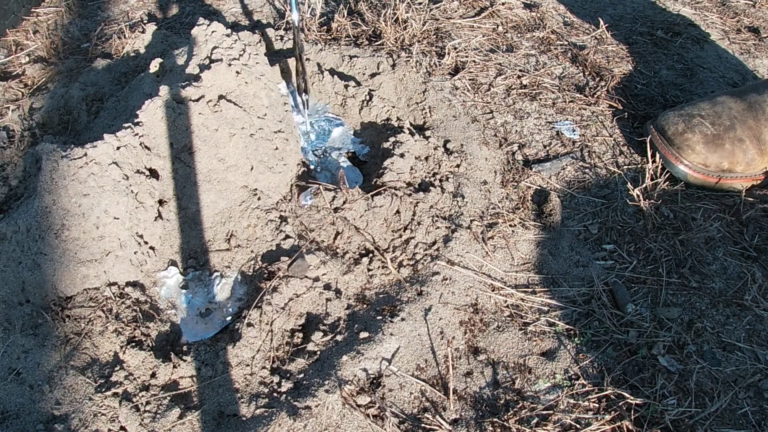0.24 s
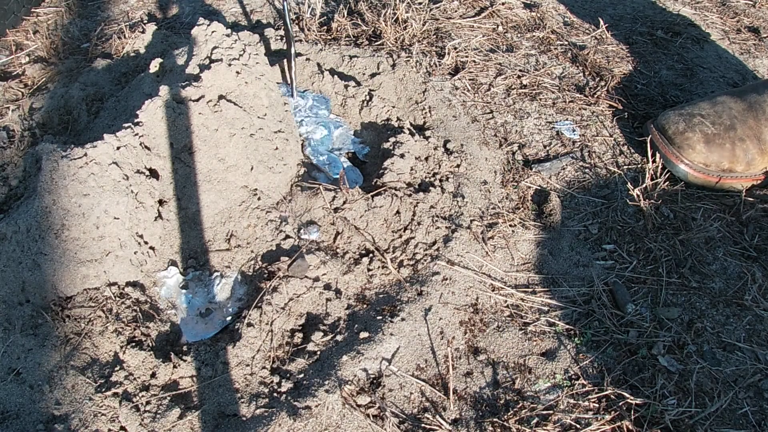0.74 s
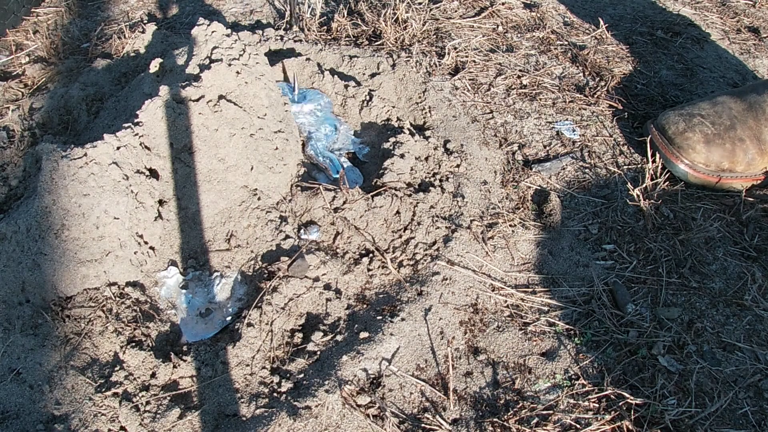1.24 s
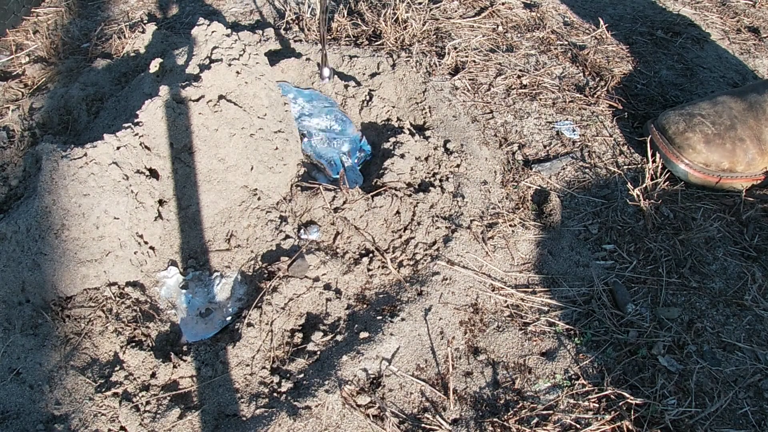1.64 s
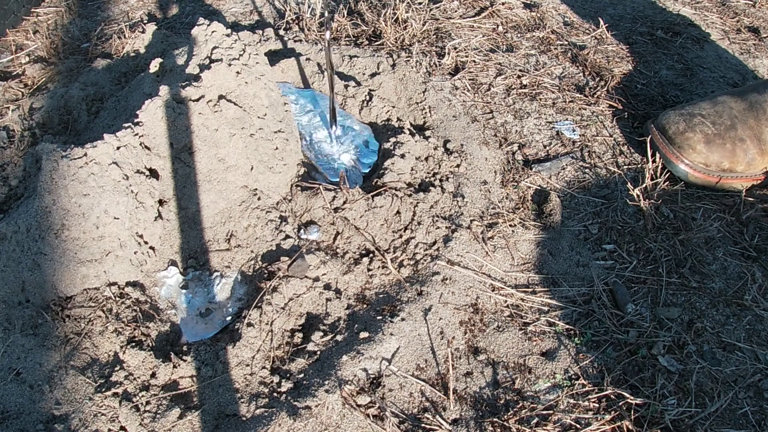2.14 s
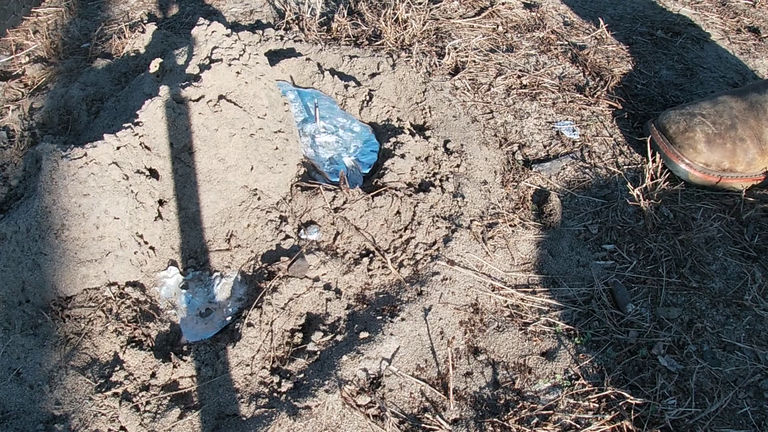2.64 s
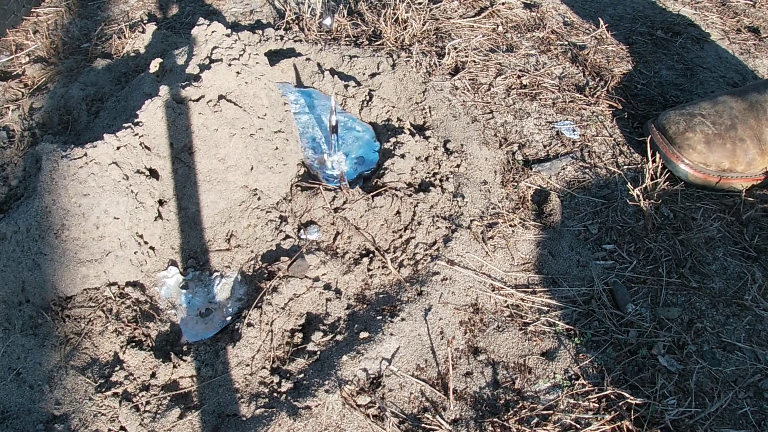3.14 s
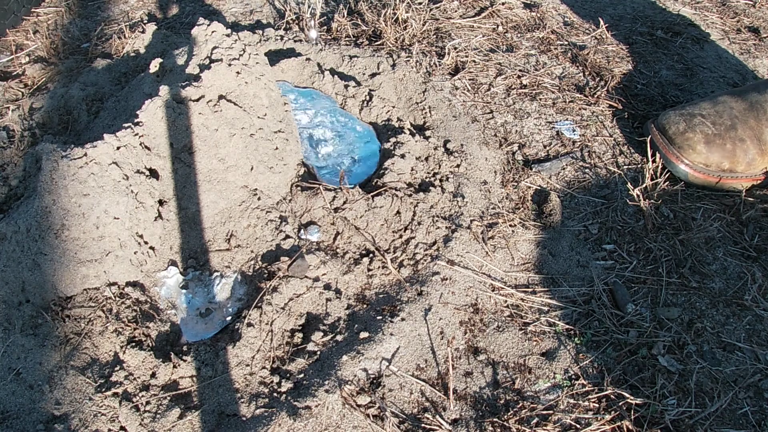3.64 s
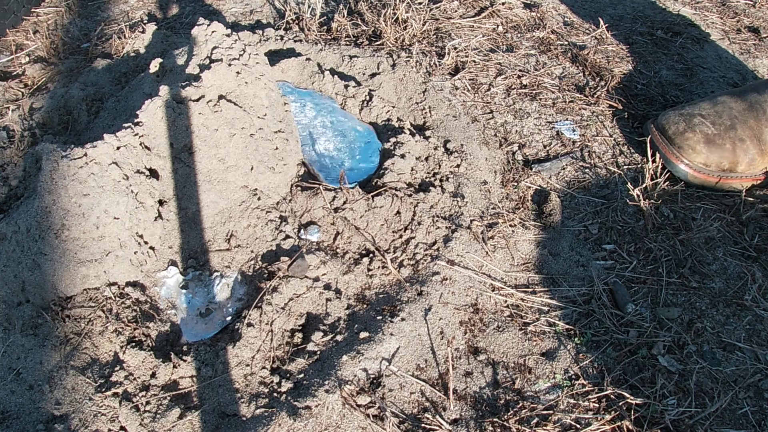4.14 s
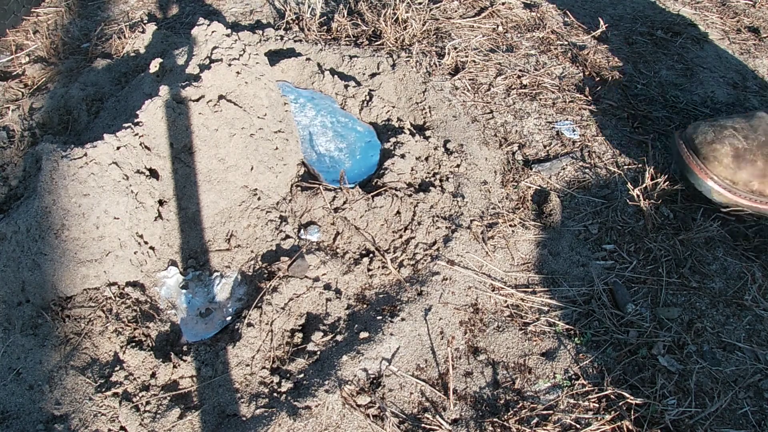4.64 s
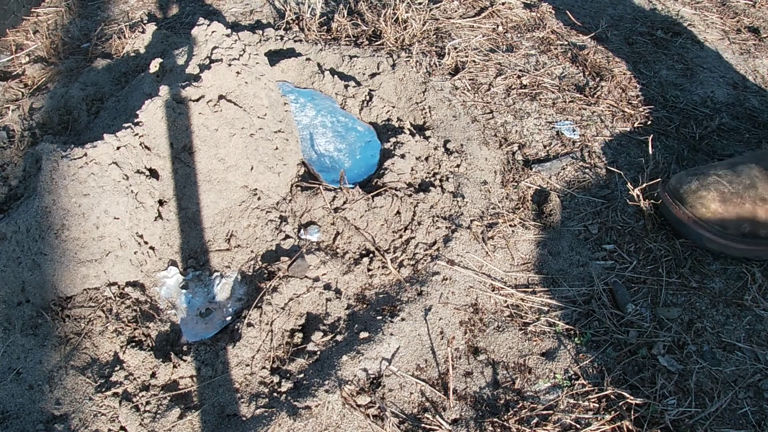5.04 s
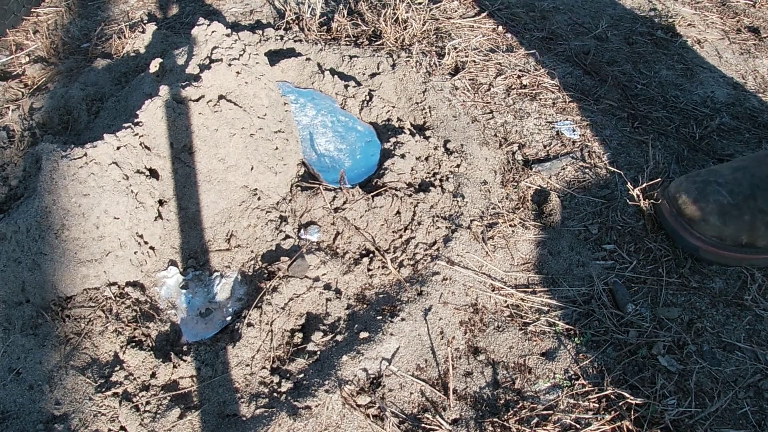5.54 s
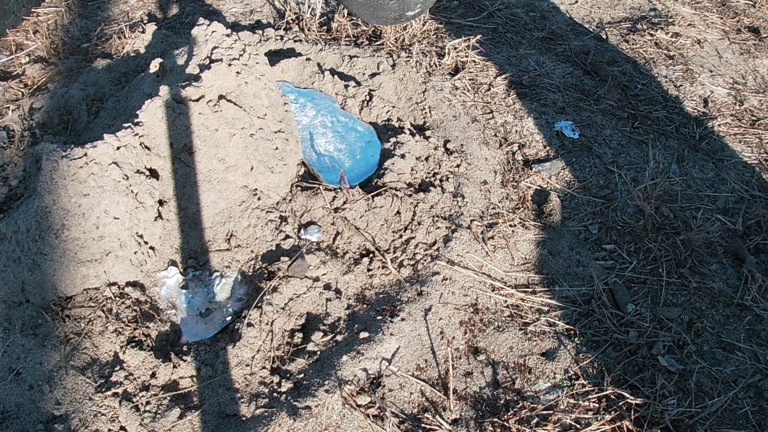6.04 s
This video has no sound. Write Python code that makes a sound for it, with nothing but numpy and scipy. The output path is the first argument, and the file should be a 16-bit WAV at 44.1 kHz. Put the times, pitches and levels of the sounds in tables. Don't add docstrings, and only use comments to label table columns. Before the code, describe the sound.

Constant burner roar outdoors, low rumble swelling and sagging irregularly beneath a steady airy rush. A small single-cylinder engine adds a slightly wavering drone and a fast, fizzy metallic rattle. A moving body dulls and reopens the high end. Faint crisp ticks come from hot metal and dry straw; the drone thickens in the second half, then a short boot thud lands just before the close. Open air, no reverberation, faint microphone hiss.

```python
import sys
import numpy as np
from scipy import signal
from scipy.io import wavfile
from scipy.ndimage import uniform_filter1d

SR = 44100
rng = np.random.default_rng(int(sys.argv[2]) if len(sys.argv) > 2 else 0)


def materialize(psi):
    bounded = np.clip(np.atleast_2d(psi).T, -1, 1)
    quanta = np.round(bounded * 32767).astype(np.int16)
    wavfile.write(sys.argv[1], SR, quanta)


def ratio(d):
    e = np.asarray(d, float) / 20
    return 10 ** e


N = 276948
TIME_S = np.arange(N) / SR

# (time [s], level [dB])
REACH = [(0.0, -51), (0.3, -49), (1.38, -49), (1.5, -51.5), (1.61, -48.5), (1.87, -51), (2.01, -47.5),
         (2.13, -50), (3.08, -43.5), (3.38, -47.5), (3.88, -45), (4.25, -46.5), (4.51, -53.5), (4.9, -48),
         (5.18, -51), (5.3, -46), (5.7, -48), (6.28, -48.5)]


def evened(x):
    return x / np.sqrt(np.mean(x ** 2) + 1e-20)


def columns(rows):
    time_s, *values = np.transpose(rows)
    return [np.interp(TIME_S, time_s, v) for v in values]


def noise(spectrum, modes=(), patchy_db=1.5, drift_db=0., tilt_db=np.zeros(N), size=1024):
    # (time [s], stance [0 first - 1 second])
    stance_path = [(0, .4), (.35, .05), (1.1, .05), (1.35, .5), (2.0, .6), (2.6, .9), (4.3, .95), (5.1, .8),
                   (5.35, .15), (5.5, .15), (5.7, .8), (6.28, .8)]
    hop = size // 4
    hz = np.fft.rfftfreq(size, 1 / SR)[:, None]
    at = np.minimum(np.arange(N // hop + 5) * hop, N - 1)
    real, imag, patches, drift = rng.standard_normal((len(at), len(hz), 4)).T
    patches = uniform_filter1d(patches, size=8, axis=0)
    patches = evened(uniform_filter1d(patches, size=10, axis=1))
    drift = uniform_filter1d(drift, size=3, axis=0)
    drift = evened(uniform_filter1d(drift, size=160, axis=1))

    stance = np.clip(columns(stance_path)[0][at], 0, 1)
    knot_hz, knot_db = np.transpose(spectrum)
    colour_db = np.interp(np.log(hz + 1), np.log(knot_hz + 1), knot_db, left=-120, right=-120)
    for centre_hz, width_hz, first_db, second_db in modes:
        lift_db = first_db + stance * (second_db - first_db)
        colour_db = colour_db + lift_db / (1 + (2 * (hz - centre_hz) / width_hz) ** 2)
    upper = np.clip(np.log2(hz / 2000 + 1e-9) / 0.5, 0, 1)
    field = ratio(colour_db + patchy_db * patches + drift_db * drift + upper * tilt_db[at])
    sound = signal.istft((real + 1j * imag) * field, nperseg=size, noverlap=size - hop)[1]
    return evened(sound[:N])


def resonate(x, hz, width_hz):
    turn = np.exp(2j * np.pi * hz * np.arange(len(x)) / SR)
    r = np.exp(-np.pi * width_hz / SR)
    return 2 * (turn * signal.lfilter([1 - r], [1, -r], x / turn)).real


def pipe_note():
    # (centre [Hz], width [Hz], level [dB])
    pipe = [(885, 41, 19), (870, 55, -5.5)]
    # (time [s], level [dB])
    pipe_view = [(0, -45), (.25, -42), (3.0, -44), (3.6, -43), (4.4, -45.5), (5.2, -49.5), (5.55, -48.5),
                 (5.95, -42.5), (6.28, -52)]
    air = rng.standard_normal(N)
    note = np.zeros(N)
    for hz, width_hz, level_db in pipe:
        narrow = resonate(air, hz, width_hz)
        note += ratio(level_db) * resonate(narrow, hz, 1.66 * width_hz)
    return ratio(columns(pipe_view)[0]) * evened(note)


def flame():
    # (time [s], flame [dB], edge [dB])
    burning = [(0, -30, -2), (.35, -25.5, 1.5), (.75, -29, 0), (1.15, -24.5, -2), (1.5, -26.5, -0.5),
               (1.8, -26.5, 0), (2.3, -26.5, 0), (2.75, -28, -1.5), (3.3, -25, 1), (3.75, -29, 0),
               (4.1, -27, 0), (4.45, -26, 0), (4.7, -28, -0.5), (5.1, -28, 0.5), (5.45, -27, -0.5),
               (5.7, -22.5, -1), (5.9, -32, -1), (6.28, -30, 2)]
    # (frequency [Hz], density [dB per Hz])
    rumble_spectrum = [(7.1, -50), (12, -16), (32, -18), (50, -12.5), (86, -5.5), (122, -1.5), (186, 1),
                       (242, -1), (289, -10.5), (403, -18.5), (464, -20), (659, -35.5), (720, -46.5),
                       (800, -24.5), (1040, -57.5), (1760, -120)]
    upper_base_db, upper_share = -23, 0.18
    flame_db, edge_db = columns(burning)
    gust = uniform_filter1d(rng.standard_normal(N), size=1500)
    flutter_db = 0.32 * evened(uniform_filter1d(gust, size=1500))
    rumble = noise(rumble_spectrum, patchy_db=0.98, size=4096)
    low = signal.sosfiltfilt(signal.butter(2, 180, fs=SR, output="sos"), rumble)
    upper_db = upper_base_db + edge_db + upper_share * (flame_db - flame_db.mean())
    roar = ratio(flame_db + 4.0) * low + ratio(upper_db) * (rumble - low)
    return ratio(flutter_db) * roar


def jet(angle):
    # (frequency [Hz], density [dB per Hz])
    jet_spectrum = [(450, -36.5), (620, 1), (760, -8.5), (1000, -4.5), (1200, -4), (2000, -4), (2400, -5.5),
                    (3300, -6.5), (3900, -7.5), (4600, -7), (5600, -13), (6500, -38)]
    # (centre [Hz], width [Hz], lift in first stance [dB], in second [dB])
    jet_modes = [(620, 40, 1, 4), (1067, 60, 4, 4), (1375, 45, 9, 2), (1550, 70, 0, 4), (1800, 90, 5, 5),
                 (2030, 200, 1, 7), (2372, 28, 6, 0), (2700, 150, 7, 5), (2900, 150, 7, 3),
                 (3085, 90, 5, 5), (3280, 100, 4, 3), (3550, 120, 0, 3), (4350, 250, 2, 4)]
    # (centre [s], half length [s], change
    # [dB], above [Hz])
    crossings = [
        (0.088, 0.17, 0, 1000),
        (1.8, 0.54, 2.5, 2200),
        (1.76, 0.38, -6, 3800),
        (2.59, .2, -4, 4200),
        (4.15, 0.41, -3.5, 2460),
        (4.07, .3, 4, 4300),
        (4.78, 0.16, -2.5, 1900),
        (6.28, 0.14, -2.5, 1600),
    ]
    jet_db, jet_share, bright_share = -38, 0.26, 0.55
    bend_s = 0.2
    open_db = uniform_filter1d(columns(REACH)[0], size=round(bend_s * SR))
    open_db = open_db - open_db.mean()
    rush = noise(jet_spectrum, jet_modes, patchy_db=0.5, drift_db=1.37, tilt_db=bright_share * open_db)
    for centre_s, half_s, change_db, above_hz in crossings:
        top = signal.sosfiltfilt(signal.butter(4, above_hz, "high", fs=SR, output="sos"), rush)
        passing = np.exp(-((TIME_S - centre_s) / half_s) ** 2)
        rush = rush + (ratio(change_db * passing) - 1) * top
    return ratio(jet_db + jet_share * open_db - 0.61 * np.cos(angle)) * rush


def engine():
    # (time [s], speed [Hz])
    shaft = [(0.0, 61.73), (0.4, 61.19), (0.8, 61.34), (1.2, 61.77), (1.6, 61.72), (2.0, 61.4),
             (2.4, 61.12), (2.8, 61.08), (3.2, 61.43), (3.6, 61.99), (4.0, 61.62), (4.4, 60.74),
             (4.8, 61.48), (5.2, 61.61), (5.6, 61.87), (6.28, 61.6)]
    # (time [s], level [dB])
    boom = [(0, -38), (1.6, -46), (2.0, -36), (3.2, -35), (3.7, -31), (4.15, -28), (4.5, -30),
            (4.75, -24.5), (6.28, -23)]
    # (multiple of shaft speed, level [dB])
    weak_orders = [(2, -41), (3.5, -45), (5, -51), (6, -56), (7, -59), (8, -62), (8.5, -63), (10, -64),
                   (11, -66), (12, -68)]
    first_db, exhaust_db = -35.5, -50
    angle = 2 * np.pi * np.cumsum(columns(shaft)[0]) / SR
    orders = [(1, first_db), (3, columns(boom)[0] - 0.3), (15 / 2, exhaust_db)] + list(weak_orders)
    phase = rng.random(len(orders)) * 2 * np.pi
    phase[0] = 0
    hum = sum(ratio(db) * np.cos(k * angle + p) for (k, db), p in zip(orders, phase))
    return np.sqrt(2) * hum, angle


def rattle(angle):
    # (frequency [Hz], density [dB per Hz])
    casing_spectrum = [(4800, -23), (5600, -9.5), (6300, -4.5), (7000, -3), (7900, -4.5), (8500, -15.5),
                       (9500, -19.5), (10400, -27.5), (11000, -34), (12300, -36), (14000, -41.5),
                       (14500, -44.5), (15500, -46), (15900, -53)]
    # (centre [Hz], width [Hz], lift in first stance [dB], in second [dB])
    casing_modes = [(6130, 250, 4.5, 4), (7010, 180, 1.5, 3.4), (7650, 250, 0, 1.1), (8540, 180, 9.5, 1.2),
                    (9030, 240, -1.5, 3.3), (10400, 240, 6.5, 2.2)]
    turn = (angle / (2 * np.pi)).astype(int)
    strength_db = uniform_filter1d(rng.standard_normal(turn[-1] + 1)[turn], size=200)
    beat_db = -2.2 * np.cos(angle) + 0.4 * np.cos(angle / 2) + 0.4 * np.cos(2 * angle)
    level_db = columns(REACH)[0] + 0.22 + beat_db + 0.27 * strength_db
    return ratio(level_db) * noise(casing_spectrum, casing_modes, patchy_db=0.44, drift_db=2.86)


def ticks():
    # (time [s], peak [dB], body [dB], body pitch [Hz])
    cracks = [(1.2745, -52, 0, 6000), (2.3345, -46, 3, 6000), (2.3775, -48, 3, 6500),
              (2.6978, -60, 0, 6000), (3.0594, -58, 4, 4000), (3.0999, -50, -9, 7000),
              (3.1368, -57, 0, 7000), (3.1472, -50, -3, 8000), (3.3378, -51, 15, 3200),
              (3.2410, -60, 0, 7000), (3.3425, -59, 2, 8000), (3.3987, -61, 0, 7000),
              (3.4141, -59, 0, 7000), (3.8232, -61, 4, 8000), (3.9943, -61, 0, 7000), (5.255, -61, 0, 7000),
              (5.9529, -61, 0, 7000), (6.0152, -57, -4, 7000), (6.0801, -59, 0, 8000)]
    length = 400
    out = np.zeros(N + length)
    t = np.arange(length) / SR
    dull = signal.butter(2, 12500, fs=SR, output="sos")
    impulse = np.where(np.arange(length) == 0, 1., 0.)
    for time_s, peak_db, body_db, hz in cracks:
        grit = rng.standard_normal(length)
        burst = impulse + 0.12 * grit * np.exp(-t / 0.0005)
        snap = resonate(resonate(burst, 10000, 4500), 10000, 6000)
        body = burst
        for width_hz in (3000, 4000, 5000):
            body = resonate(body, hz, width_hz)
        tick = signal.sosfilt(dull, snap + ratio(body_db + 16) * body)
        start = round((time_s + 0.0011) * SR)
        out[start:][:length] -= ratio(peak_db + 15.5) * tick
    return out[:N]


def footstep():
    # (time [s], peak [dB], pitch [Hz])
    boot = (5.9856, -28, 550)
    time_s, peak_db, hz = boot
    t = np.maximum(TIME_S - time_s, 0)
    swing = -np.sin(2 * np.pi * hz * (t + 0.0004 * (1 - np.exp(-t / 0.001))))
    envelope = (1 - np.exp(-t / 0.0002)) * np.exp(-t / 0.0045)
    return 2.3 * ratio(peak_db) * envelope * swing


def preamp(dry):
    # (frequency [Hz], density [dB per Hz])
    hiss_spectrum = [(9500, -19.5), (11000, -4.5), (12300, 1), (14000, -7.5), (14500, -11), (15500, -8.5),
                     (15900, -21)]
    hiss_db, ceiling = -82, 0.8
    noisy = dry + ratio(hiss_db) * noise(hiss_spectrum, patchy_db=1.1)
    return ceiling * np.tanh(noisy / ceiling)


def scene():
    hum, angle = engine()
    burner = flame() + pipe_note() + jet(angle)
    return (burner + hum + rattle(angle) + ticks() + footstep())[None]


def top_cut(x):
    return signal.sosfilt(signal.butter(12, 15720, fs=SR, output="sos"), x)


def record(dry):
    mix = preamp(dry)
    return top_cut(mix)


dry = scene()
out = record(dry)
materialize(out)
```